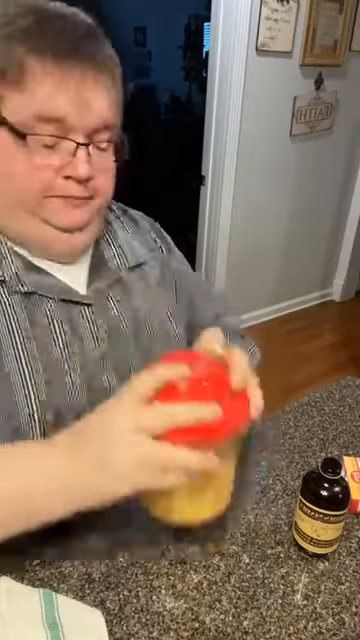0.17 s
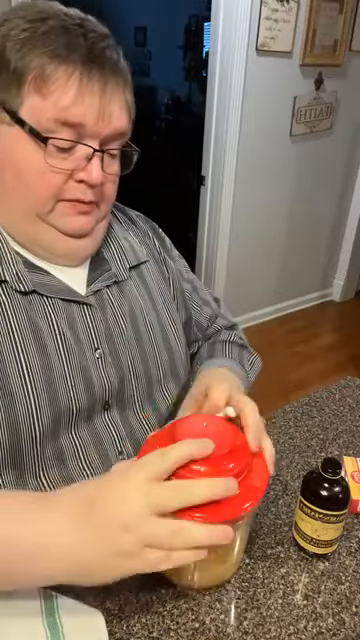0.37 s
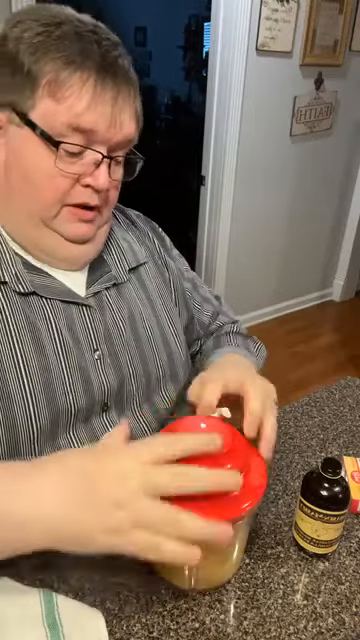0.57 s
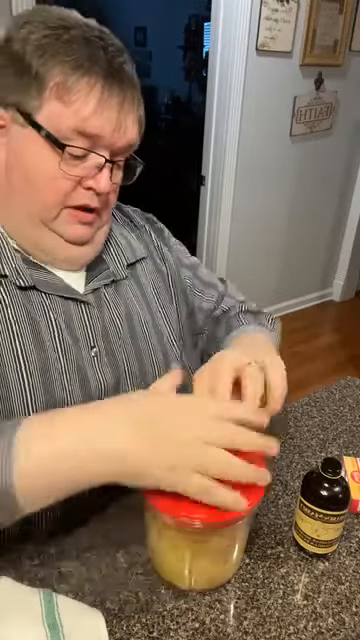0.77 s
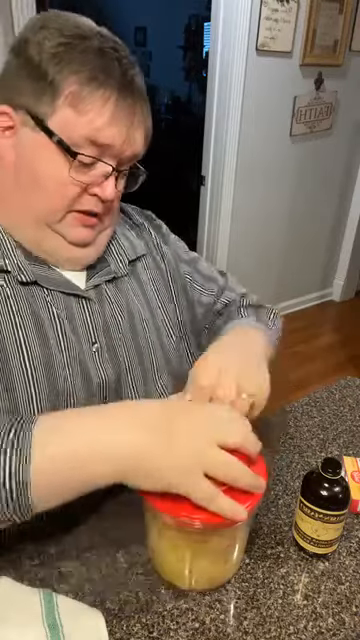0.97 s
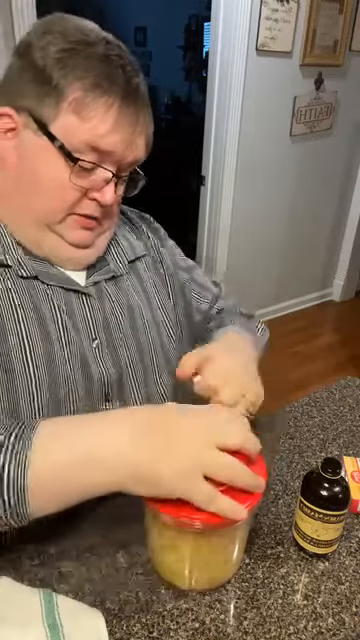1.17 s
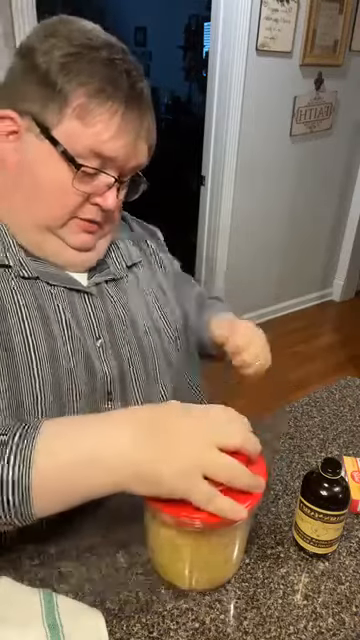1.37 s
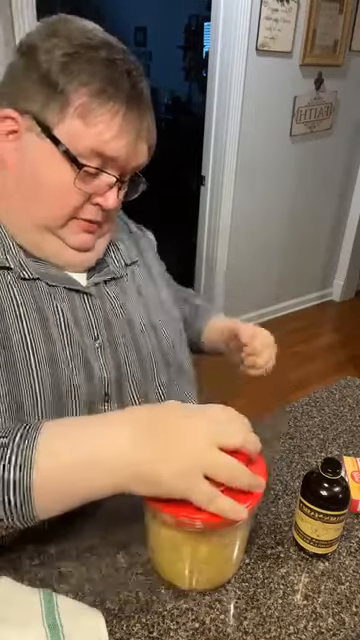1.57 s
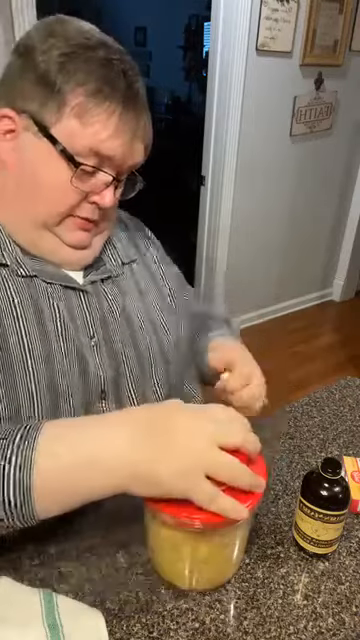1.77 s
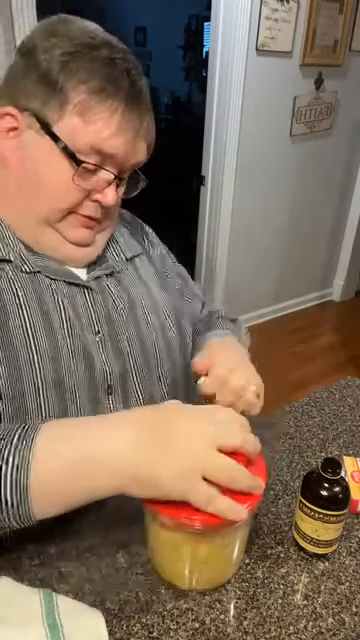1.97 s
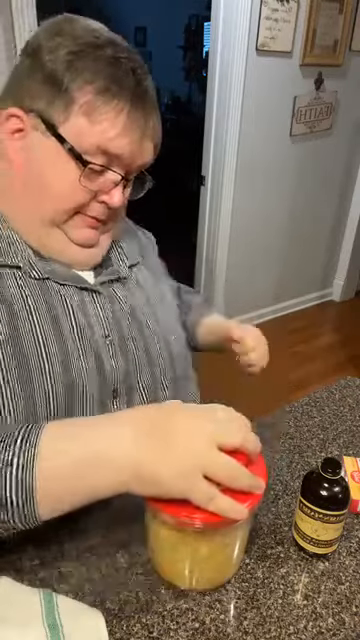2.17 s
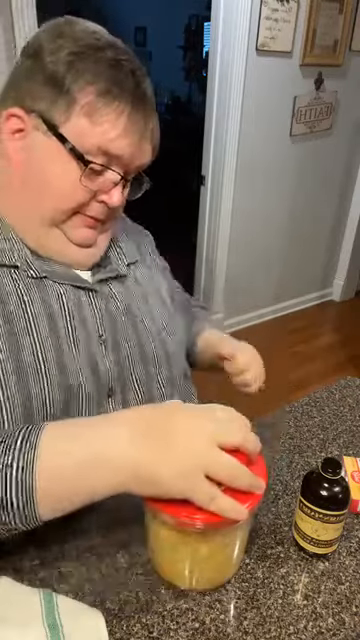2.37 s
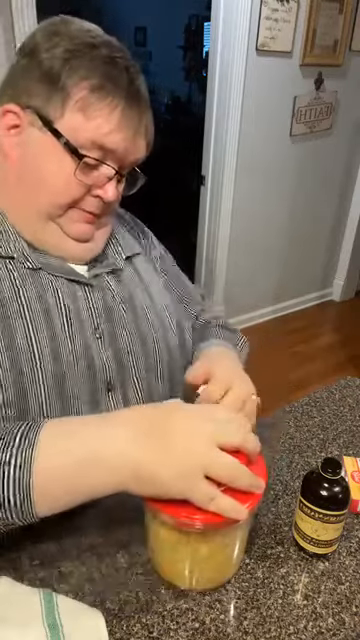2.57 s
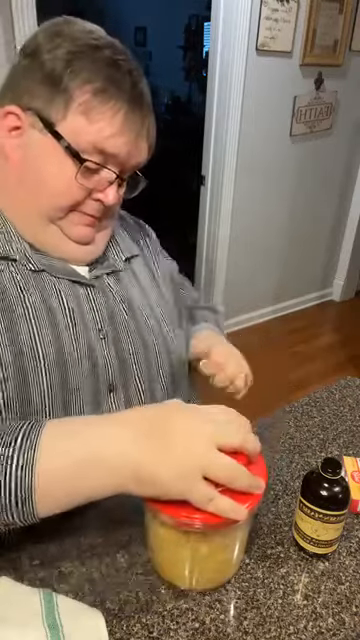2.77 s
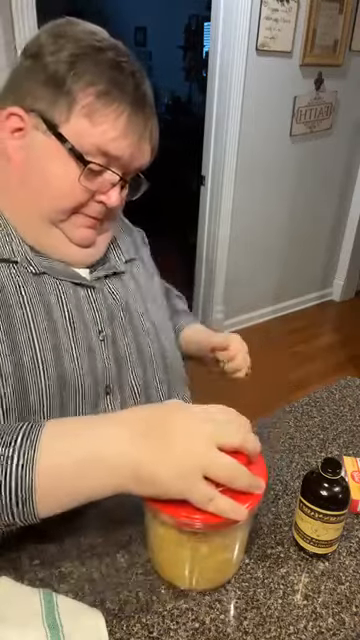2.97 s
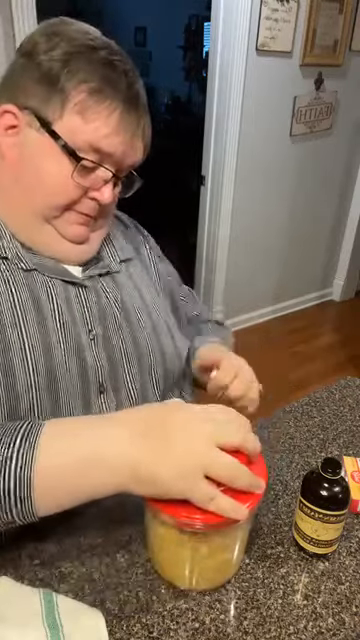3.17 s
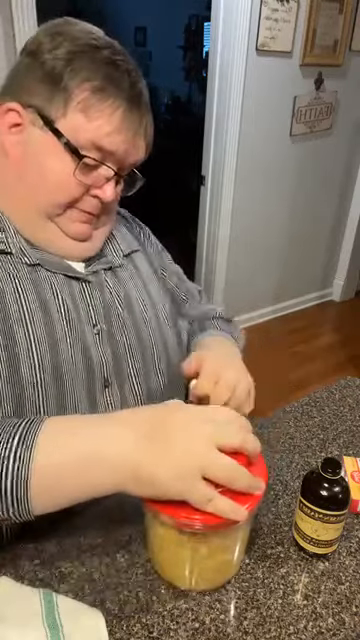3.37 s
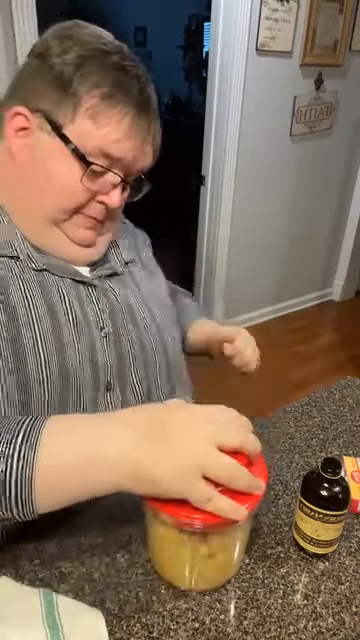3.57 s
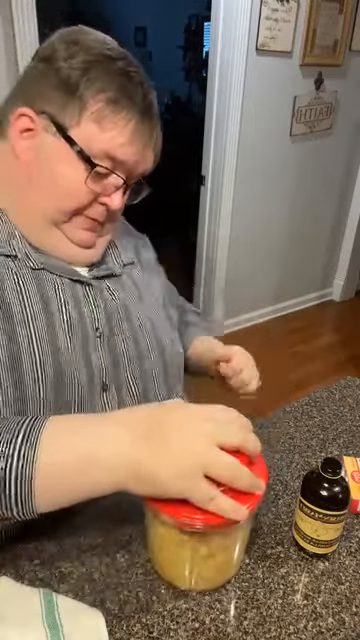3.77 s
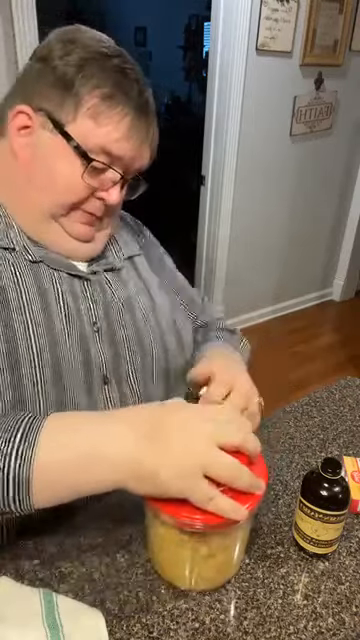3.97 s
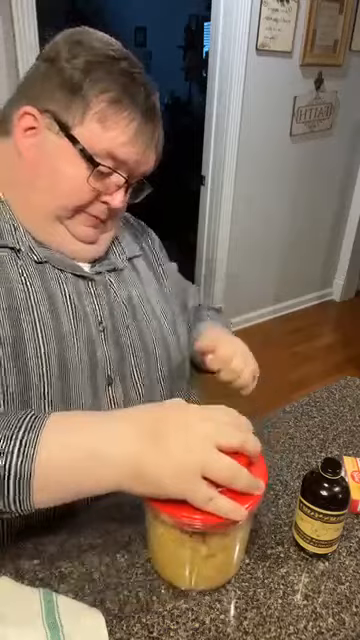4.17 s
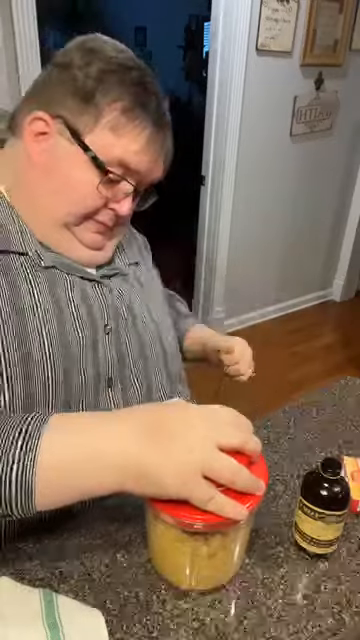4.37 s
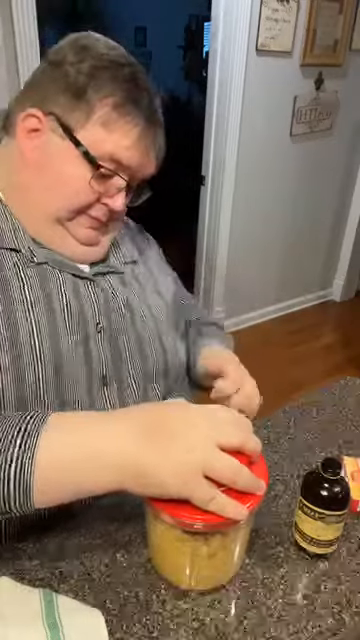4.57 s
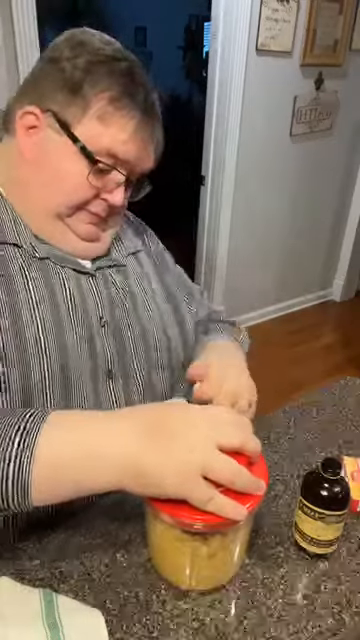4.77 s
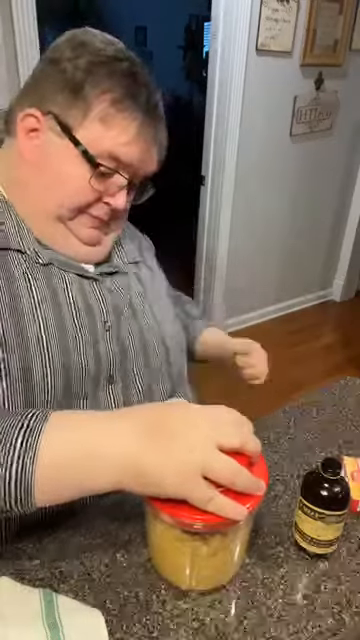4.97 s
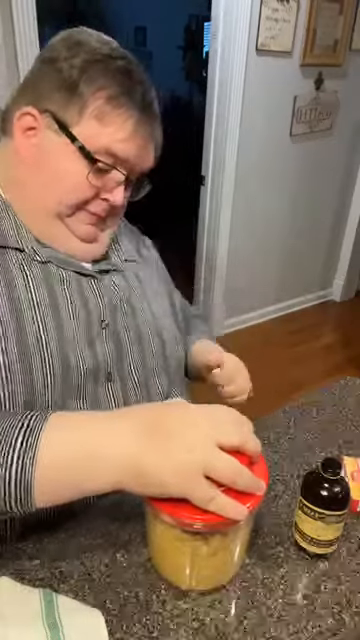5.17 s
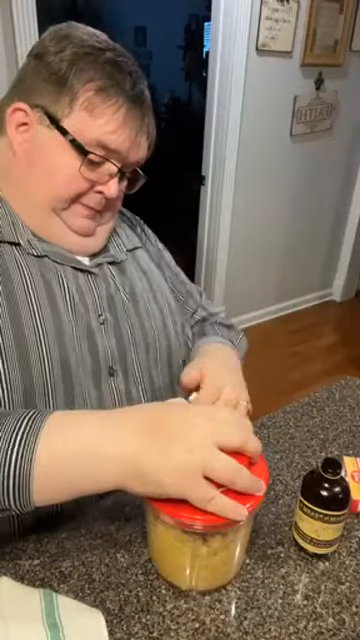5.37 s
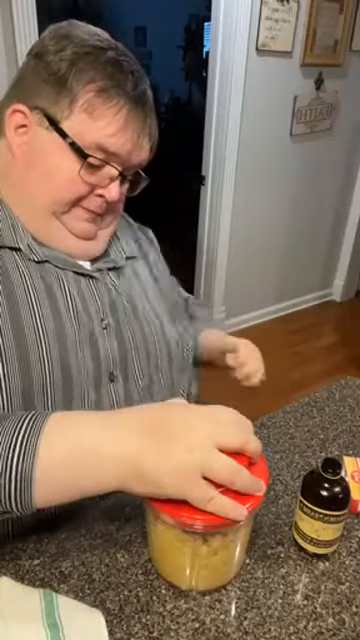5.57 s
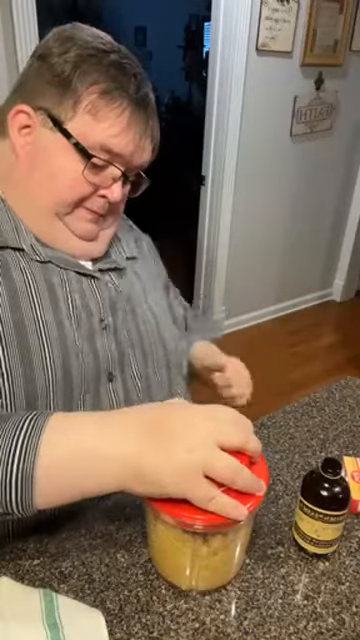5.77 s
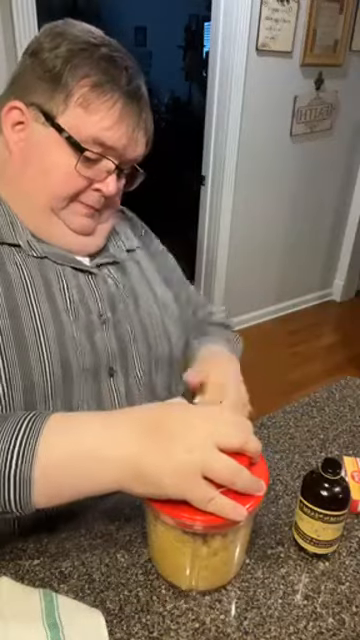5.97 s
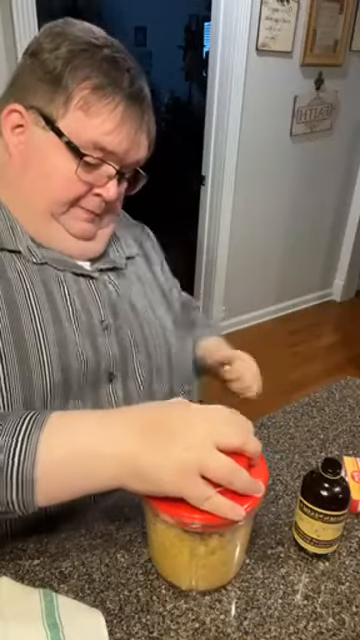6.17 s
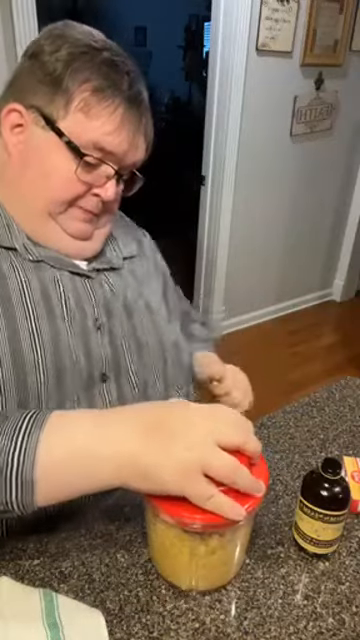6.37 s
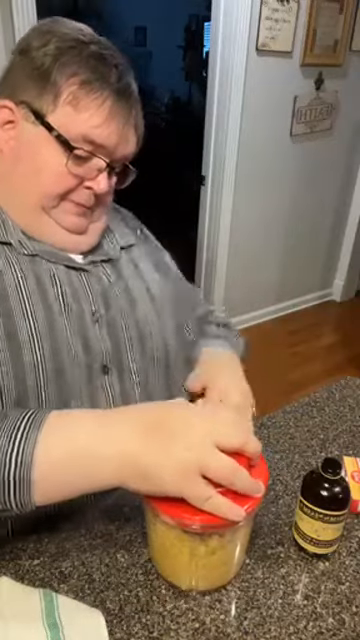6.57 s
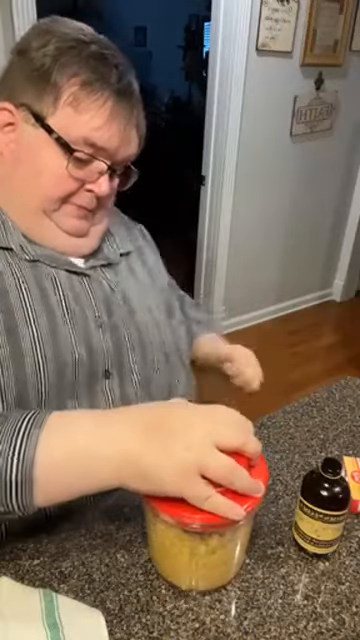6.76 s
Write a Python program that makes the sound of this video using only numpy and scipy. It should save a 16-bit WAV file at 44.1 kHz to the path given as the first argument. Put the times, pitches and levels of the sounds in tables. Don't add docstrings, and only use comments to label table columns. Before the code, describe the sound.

A jar is shaken and knocked onto a stone counter, then a hand-pulled plastic chopper rattles and clacks stroke after stroke, churning apple pieces.

```python
import sys
import numpy as np
from scipy import signal
from scipy.fft import rfft, irfft, next_fast_len
from scipy.io import wavfile
from scipy.ndimage import uniform_filter1d

SR = 44100
rng = np.random.default_rng(int(sys.argv[2]) if len(sys.argv) > 2 else 0)


def invert_db(x):
    u = np.asarray(x, float) / 20
    return 10 ** u


def dump(signal):
    limited = np.clip(np.atleast_2d(signal).T, -1, 1)
    pcm = np.round(limited * 32767).astype(np.int16)
    wavfile.write(sys.argv[1], SR, pcm)


N = 301644

# [start/s, share of the stroke before top speed/0-1, effort/dB, lid ring/dB, fall to the turn/dB]
STROKES = [(1.288, 0.6, -34, 2, 30), (1.735, 0.35, -31, -1, 16.5), (2.091, 0.5, -30.5, 1.5, 30),
           (2.427, .48, -31.5, -3.5, 19), (2.788, .51, -30.5, -4, 34), (3.134, .4, -31, -1.5, 14.5),
           (3.489, 0.41, -30, -2.5, 29), (3.836, 0.34, -31, -5, 17.5), (4.199, .5, -31, 1, 30),
           (4.539, 0.43, -32, -2, 14.5), (4.9, 0.48, -29.5, 1, 32), (5.226, 0.32, -29.5, -1, 17.5),
           (5.55, 0.53, -30, 1, 22.5), (5.835, 0.41, -30, 2, 20), (6.165, 0.38, -32, -1, 32),
           (6.459, 0.32, -29.5, -0.5, 16.5), (6.75, .4, -30.5, -5, 22)]
# [ratio to the struck pitch, level/dB, t60/s]
PAWL_MODES = [(.91, 10.5, 0.0066), (1, 12.5, 0.0094), (1.08, -48, 0.0031)]
KNOCK_S = 0.4903


def evened(x):
    return x / np.sqrt(np.mean(x ** 2) + 1e-20)


def read(points, hz):
    f, value = np.transpose(points)
    return np.interp(np.log(hz + 1), np.log(f + 1), value)


def add(mix, s, sound):
    part = mix[max(round(s * SR), 0):][:len(sound)]
    part += sound[:len(part)]


def coloured(x, spectrum):
    hz = abs(np.fft.fftfreq(8192, 1 / SR))
    log_gain = np.log(invert_db(np.maximum(read(spectrum, hz), -100)))
    taps = np.fft.ifft(np.exp(np.conj(signal.hilbert(log_gain)))).real
    return evened(signal.oaconvolve(x, taps)[:len(x)])


def resonated_twice(x, hz, width_hz):
    peak = signal.iirpeak(hz, hz / width_hz, SR)
    return signal.lfilter(*peak, signal.lfilter(*peak, x))


def grains(per_s, spread_db, bed, hold=0.816):
    chance, height = rng.random((N, 2)).T
    size = invert_db(spread_db * np.minimum(-np.log(height + 1e-9), 3)) * (chance < per_s / SR)
    burst = rng.standard_normal(N) * signal.lfilter([1], [1, -hold], size)
    return evened(burst) + bed * rng.standard_normal(N)


def ring(modes, hz, rise_s, size):
    t = np.arange(size) / SR
    ratio, db, t60 = np.transpose(modes)[:, :, None]
    stray_db, detune, phase = rng.standard_normal((3, len(modes), 1))
    decay = invert_db(db + 2 * stray_db - 60 * t / t60)
    out = decay * np.sin(2 * np.pi * hz * ratio * (1 + 0.023 * detune) * t + 0.5 * phase)
    out = out.sum(0) * np.minimum(t / rise_s, 1)
    return out / abs(out).max()


def follow(name):
    # [top above effort/dB, rise/dB, share of the fall]
    pull = [
        (-8.5, 14, 2.5),
        (-0.5, 18, 1.5),
        (-0.5, 25, 2.9),
        (-10.5, 19, 1.3),
    ]
    # [top above effort/dB, rise/dB, share of the fall]
    rewind = [
        (0.6, 12.3, 1.02),
        (-5.5, 7.3, 1),
        (0.5, 5.3, 1.14),
        (-0.3, 8.8, 0.95),
    ]
    # [t/s, rattle level/dB]
    handling = [
        (0.0, -51),
        (0.064, -51),
        (0.14, -45),
        (0.21, -52),
        (0.26, -85),
        (0.8, -76),
        (1.056, -57),
        (1.2, -75),
        (1.29, -58),
    ]
    # [rattle/dB, churn/dB, lid ring/dB, teeth/dB]
    handling_above = (3.5, -2.5, 1, 1.5)
    rise_bend, fall_bend = np.array([1.57, 1.8]), np.array([2.87, 1.41])
    stop_s, pause_s, pause_db = 7.05, 0.044, -4.5

    layer = ["rattle", "churn", "lid ring", "teeth"].index(name)
    t = np.arange(N) / SR
    start, top, effort_db, ring_db, fall_db = np.transpose(STROKES)
    end = np.append(start[1:], stop_s)
    k = np.maximum(np.searchsorted(start, t, "right") - 1, 0)
    way = k % 2
    place = (t - start[k]) / (end - start)[k]
    top = np.clip(top, 0.1, 0.9)[k]
    above_db, rise_db, fall = np.array([pull[layer], rewind[layer]])[way].T
    before = np.maximum(1 - place / top, 0)
    after = np.maximum((place - top) / (1 - top), 0)
    db = effort_db[k] + above_db - rise_db * before ** rise_bend[way]
    db = db - fall * fall_db[k] * after ** fall_bend[way]
    if name == "lid ring":
        db = db + ring_db[k]
    db = db + pause_db * way * (end[k] - t < pause_s)
    handling_db = np.interp(t, *np.transpose(handling)) + handling_above[layer]
    return uniform_filter1d(invert_db(np.where(t < start[0], handling_db, db)), 90)


def room_tone():
    # [f/Hz, level per Hz/dB]
    tone = [(60, -24), (90, -17), (160, -14), (760, -24), (2000, -33), (3500, -32), (10000, -52),
            (16000, -68)]
    return invert_db(-55.5) * coloured(rng.standard_normal(N), tone)


def kitchen(x):
    # [f/Hz, t60/s]
    decay = [(200, 0.36), (2000, 0.38), (12000, 0.56)]
    taps = np.zeros(SR // 2)
    at = np.arange(300, SR // 2 - 20, 20)
    taps[at + rng.integers(0, 20, len(at))] = rng.choice([-1., 1.], len(at))
    hz, t, z = signal.stft(taps, SR, nperseg=256)
    tail = signal.istft(z * invert_db(-60 * t / read(decay, hz)[:, None]), SR, nperseg=256)[1]
    return signal.oaconvolve(x, tail / np.linalg.norm(tail))[:N]


def counter():
    # [f/Hz, level per Hz/dB]
    shaking = [(1, 8), (6, 10), (25, 0), (40, -1), (49, -12), (58, -7), (72, -15), (130, -45), (300, -140)]
    # [t/s, shudder level/dB]
    leaning = [(0.0, -37.5), (0.07, -36), (0.43, -55.5), (0.5, -36), (0.78, -43), (1.22, -37.5), (1.4, -36),
               (1.96, -47), (2.16, -33.5), (2.62, -44.5), (2.86, -36), (3.5, -31.5), (3.85, -43),
               (4.3, -32.5), (5.2, -35.5), (6.12, -46), (6.22, -36), (6.72, -48.5)]
    # [start/s, hold/s, hum level/dB]
    shoves = [(0.52, 0.028, -27), (1.377, 0.033, -36), (1.526, 0.072, -35.5), (1.914, 0.027, -40.5),
              (2.19, 0.047, -29.5), (2.67, 0.029, -42.5), (2.888, .07, -28), (3.395, .03, -54),
              (3.615, 0.07, -30), (4.066, 0.027, -40), (4.296, 0.048, -31.5), (4.99, .1, -36.5),
              (5.159, 0.023, -28.5), (5.447, .04, -43), (5.657, 0.091, -28.5), (6.006, 0.043, -41),
              (6.284, 0.12, -42.5), (6.663, .03, -36.5), (6.824, .05, -40)]
    rise_db_per_s, fall_db_per_s, hum_rest_db = 300, 141, -15.5

    hum = resonated_twice(rng.standard_normal(N), 104, 18)
    under = resonated_twice(hum[::-1] + rng.standard_normal(N), 82, 18)
    size = next_fast_len(N)
    spectrum = rfft(rng.standard_normal(size)) * invert_db(read(shaking, np.fft.rfftfreq(size, 1 / SR)))
    shudder = irfft(spectrum, size)[:N]

    t = np.arange(0, N, 100) / SR
    s, hold, db = np.transpose(shoves)[:, :, None]
    lean = invert_db(np.interp(t, *np.transpose(leaning)))
    shove_db = db - rise_db_per_s * np.maximum(s - t, 0) - fall_db_per_s * np.maximum(t - s - hold, 0)
    shove = (invert_db(shove_db).sum(0) + invert_db(hum_rest_db) * lean) * (t > KNOCK_S)
    shove, lean = (np.interp(np.arange(N) / SR, t, gain) for gain in (shove, lean))
    return shove * evened(evened(hum) + invert_db(-2) * evened(under)) + lean * invert_db(6) * evened(shudder)


def knock():
    # [f/Hz, level/dB, t60/s]
    jar = [
        (56.8, -15.5, 0.39),
        (109, -15.5, 0.39),
        (261, -5.5, 0.084),
        (340, 2.5, 0.018),
        (415, -24, 0.044),
        (586, 0, 0.015),
        (814, -13, 0.044),
        (1260, -31, 0.048),
        (1890, -19, .05),
    ]
    # [f/Hz, level per Hz/dB]
    fruit = [(88, -30), (150, -11), (276, -16), (931, -12), (1050, -26.5), (1960, -19), (2250, -24),
             (7030, -38.5), (16400, -64)]
    level_db = -2
    t = np.arange(SR // 2) / SR
    hz, db, t60 = np.transpose(jar)[:, :, None]
    build = np.minimum(3 * hz * t, 1)
    modes = (invert_db(db - 60 * t / t60) * np.sin(2 * np.pi * hz * t) * build).sum(0)
    modes = np.convolve(modes, np.hanning(40) / 20)[:len(t)]
    crash = coloured(rng.standard_normal(len(t)), fruit)
    crash = crash * invert_db(-11 - 60 * t / 0.12) * np.minimum(t / 0.00059, 1)
    out = np.zeros(N)
    add(out, KNOCK_S, invert_db(level_db) * modes)
    add(out, KNOCK_S + 0.0015, invert_db(level_db) * crash)
    return out


def churn():
    # [f/Hz, level per Hz/dB]
    thuds = [(120, -27), (190, -2), (372, -3), (445, -0.5), (1250, -5.5), (2060, -5), (2420, -9),
             (3750, -20.5), (4850, -27.5), (8820, -27.5), (15100, -81), (16400, -55)]
    return follow("churn") * invert_db(6) * coloured(grains(1300, 5, 0.71, hold=0.99), thuds)


def lid_ring():
    free_hz, loaded_hz, width_hz = 1990, 2090, 110
    drive = grains(500, 3, 0.22)
    free, loaded = (signal.lfilter(*signal.iirpeak(f, f / width_hz, SR), drive) for f in (free_hz, loaded_hz))
    pulling = np.searchsorted(np.transpose(STROKES)[0], np.arange(N) / SR) % 2
    return follow("lid ring") * invert_db(0.5) * evened(np.where(pulling, loaded, free))


def ratchet():
    # [f/Hz, level per Hz/dB]
    loose = [(530, -36), (900, -10), (1280, 0), (1380, 5), (1960, 0), (2320, 0.5), (3550, 7), (4410, -1),
             (7710, -11.5), (8600, -12.5), (14300, -33), (16400, -76)]
    teeth_per_s, unevenness, spread_db, pawl_hz = 140, 0.55, 5.5, 3620
    wander = evened(uniform_filter1d(rng.standard_normal(N), 300))
    passed = np.cumsum(teeth_per_s * np.abs(1 + unevenness * wander)) / SR
    at = np.flatnonzero(np.diff(np.floor(passed)))
    size, pitch = rng.standard_normal((2, len(at)))
    size = invert_db(spread_db * np.minimum(size, 1.5))
    teeth, jolts = np.zeros(N), np.zeros(N)
    for i, gain, hz in zip(at, size, pawl_hz * (1 + 0.045 * pitch)):
        add(teeth, i / SR, gain * ring(PAWL_MODES, hz, 0.0025, size=400))
    jolts[at] = size
    jolts = evened(signal.lfilter([1], [1, -0.965], jolts) * rng.standard_normal(N))
    rattle = coloured(1.2 * jolts + grains(700, 1.1, 0.28, hold=0.99), loose)
    return follow("teeth") * invert_db(-0.5) * evened(teeth) + follow("rattle") * invert_db(1) * rattle


def blows():
    # [t/s, pawl level/dB, lid above pawl/dB, tick above pawl/dB,
    # pawl f/Hz]
    engages = [(1.4034, -23, 1, -8, 2900), (2.087, -16, -6.5, -16.5, 3100),
               (2.0912, -16.5, -0.5, -15, 3460), (2.7878, -10, -5.5, -21.5, 3470),
               (3.49, -8, -9, -11, 3630), (4.2012, -5, -8.5, -15, 3610), (4.8956, -8.5, -4, -14.5, 3460),
               (5.5511, -7.5, -7.5, -19.5, 3450), (6.164, -8.5, -2.5, -15.5, 3600),
               (6.4813, -8.5, -9.5, -13.5, 3680), (6.7535, -11.5, -3, -14, 3480)]
    # [t/s, pawl level/dB]
    releases = [
        (1.736, -28.5),
        (1.749, -24),
        (2.4326, -29),
        (2.4393, -25),
        (3.1383, -19.5),
        (3.839, -21),
        (4.542, -23.5),
        (5.2275, -20.5),
        (5.8438, -17),
        (6.4667, -19),
    ]
    # [t/s, pawl level/dB, tick above pawl/dB]
    catches = [(1.767, -25, -10), (1.808, -19, -17), (1.813, -20, -17), (1.8511, -18, -13),
               (1.866, -17, -19), (1.9305, -21, -19), (1.9673, -25, -5), (2.0199, -20.5, -18),
               (2.4556, -19, -7.5), (2.4605, -17.5, -28), (2.5, -28, -10), (2.524, -21, -14),
               (2.5417, -16, -18), (2.5586, -13.5, -15), (2.614, -24, -20), (2.645, -28, -12),
               (2.719, -24, -13), (2.741, -32, -20), (2.765, -35, -12), (3.147, -25, -25),
               (3.1626, -16.5, -14.5), (3.2748, -15.5, -20), (3.415, -21, -18), (3.448, -27, -14),
               (3.8638, -15, -14), (3.9266, -21.5, -13), (3.9762, -14, -19), (3.9854, -15, -12.5),
               (4.0526, -16.5, -21), (4.123, -23.5, -10), (4.138, -27, -22), (4.155, -29, -16),
               (4.5983, -21, -14), (4.693, -16.5, -18), (4.799, -25.5, -9), (4.8252, -21.5, -29),
                    (5.2451, -23, -6), (5.2644, -19.5, -8.5), (5.3119, -15.5, -16), (5.324, -17, -21),
                    (5.3972, -18, -19), (5.4948, -23.5, -16), (5.8627, -14.5, -16), (5.9143, -22, -16),
                    (6.5, -22, -27), (6.525, -25, -18), (6.5591, -19, -24.5), (6.5858, -16.5, -30),
                    (6.607, -21, -17), (6.6123, -17, -19), (6.6243, -23, -25), (6.6362, -27, -25),
                    (6.6675, -22.5, -8)]
    # [t/s, pawl level/dB, lid above pawl/dB, tick above pawl/dB, lid f/Hz]
    knocks = [(0.013, -43, 8, -11, 1500), (0.026, -40, 9, -16, 1670), (0.0618, -34.5, 2, -14, 1620),
              (0.106, -24, 0.5, -5.5, 2240), (0.1244, -18.5, -3, -14, 1550), (0.199, -34.5, 5, -26, 1760),
              (0.573, -42, 11, -9, 1860), (0.5853, -42.5, 12.5, -14, 1650), (0.978, -47, -4, -5, 1780),
              (1.04, -39, 6, -15, 1770), (1.065, -43.5, 7.5, -25, 1630), (1.5518, -26, 4.5, -1.5, 2480),
              (1.588, -24.5, -10, 0.5, 2010), (3.5777, -13, -9, -9, 2120), (3.7247, -24.5, 5, -15, 1905),
              (4.2415, -34, 11, -16, 1570), (5.1432, -16, -3.5, -16.5, 1920), (6.235, -25.5, -16, -1, 1900)]
    pawl_hz, slack_pawl_hz, drawn_s = 3497, 2750, 1.45
    lid_hz, engage_lid_hz, pitch_spread = 1835, 2010, 0.037

    rows = [(s, db, -9, -27, lid_hz) for s, db in releases]
    rows += [(s, db, -4.5, tick_db, lid_hz) for s, db, tick_db in catches]
    rows += [*knocks]
    stray = 1 + pitch_spread * rng.standard_normal((len(rows), 2))
    out = [(*row, engage_lid_hz) for row in engages]
    for (s, db, lid_db, tick_db, hz), (a, b) in zip(rows, stray):
        out.append((s, db, lid_db, tick_db, (pawl_hz if s > drawn_s else slack_pawl_hz) * a, hz * b))
    return out


def clacks():
    # [ratio to the struck pitch, level/dB, t60/s]
    lid = [(.72, -1.5, 0.009), (.86, -3.5, 0.017), (1, -3, 0.017), (1.2, -1, 0.0089)]
    # [f/Hz, level per Hz/dB]
    contact = [(3500, -9), (4600, -1.5), (6000, 3), (7600, -9), (8400, 1), (10800, -14), (13100, -24.5),
               (16000, -20)]
    # [delay/s, level/dB]
    rebounds = [
        (.0035, -15),
        (-.0085, -16),
        (-.0027, -14),
        (.0078, -17),
        (.014, -22),
    ]
    full_chatter_db = -12.5
    body, tick, t = np.zeros(N), np.zeros(N), np.arange(1000) / SR
    for s, pawl_db, lid_db, tick_db, pawl_hz, lid_hz in blows():
        chatter = [(0.00013, 0.037), *rebounds]
        if pawl_db <= full_chatter_db:
            chatter = chatter[:2]
        for delay, db in chatter:
            at, level_db = s + delay, pawl_db + db
            add(body, at, invert_db(level_db + lid_db + 4) * ring(lid, lid_hz, 0.0012, size=900))
            add(body, at, invert_db(level_db + 4.5) * ring(PAWL_MODES, pawl_hz, 0.00083, size=600))
            add(tick, at, invert_db(level_db + tick_db + 4 - 60 * t / 0.017) * np.minimum(t / 0.00077, 1))
    return body + tick * coloured(rng.standard_normal(N), contact)


def scene():
    chopper = knock() + churn() + lid_ring() + ratchet() + clacks()
    return (room_tone() + invert_db(-12) * kitchen(chopper) + counter() + chopper)[None]


def band_limit(x):
    return signal.sosfilt(signal.butter(12, 16510, fs=SR, output="sos"), x)


def record(dry):
    edge = signal.firwin(255, 16100, window=("kaiser", 7), fs=SR)[None]
    mix = signal.oaconvolve(np.clip(dry, -0.96, 0.96), edge, "same")
    return band_limit(mix)


dry = scene()
out = record(dry)
dump(out)
```